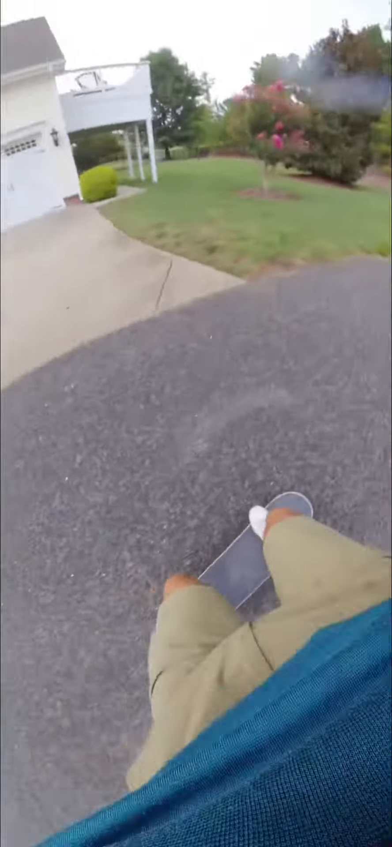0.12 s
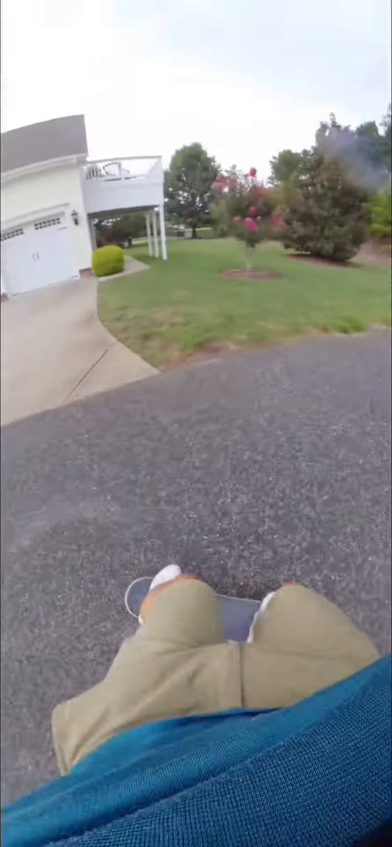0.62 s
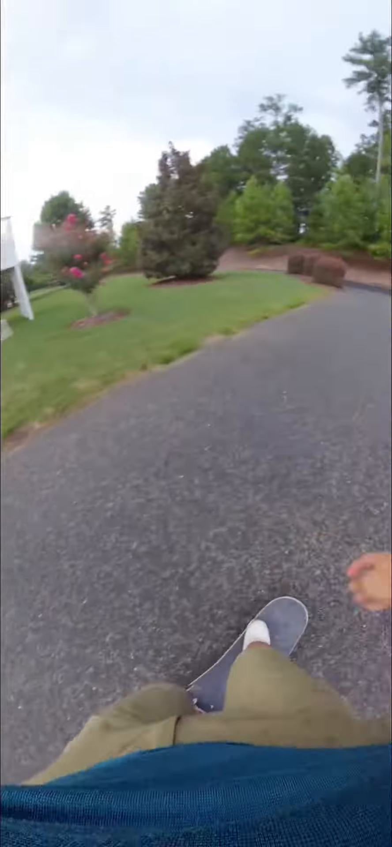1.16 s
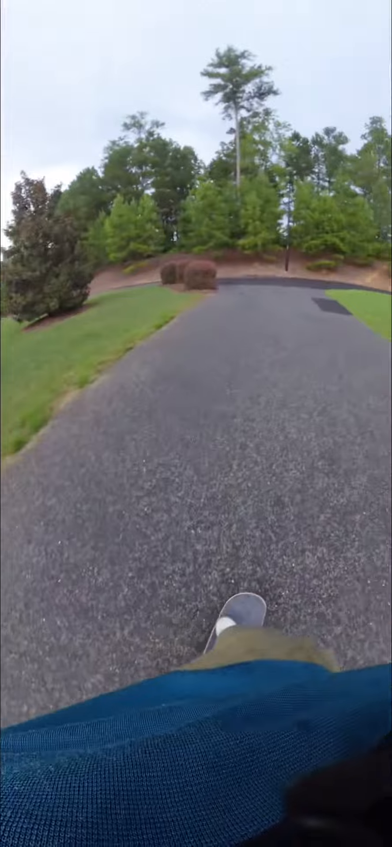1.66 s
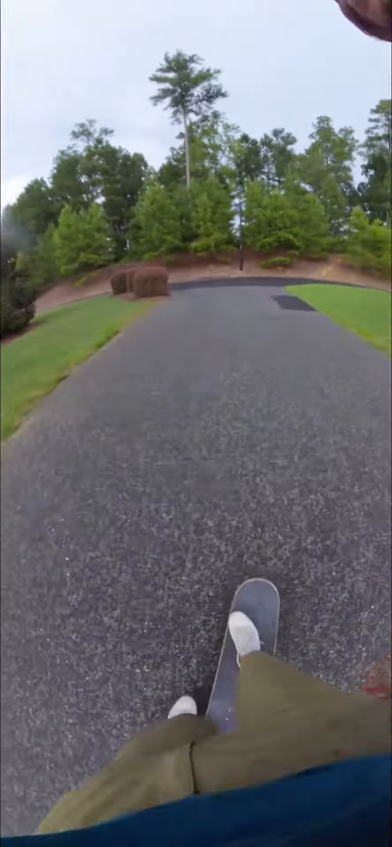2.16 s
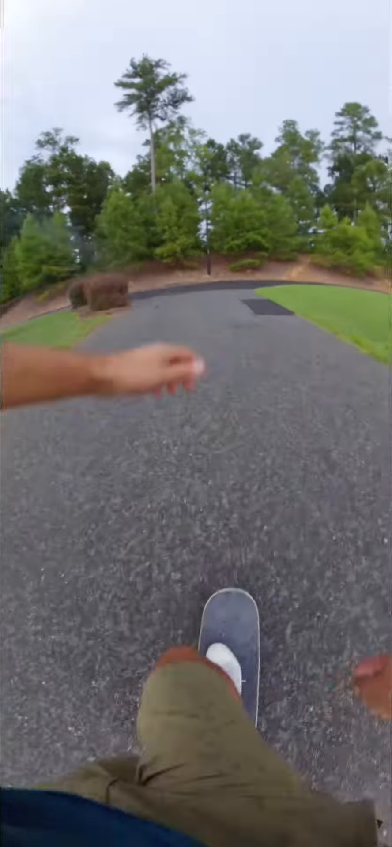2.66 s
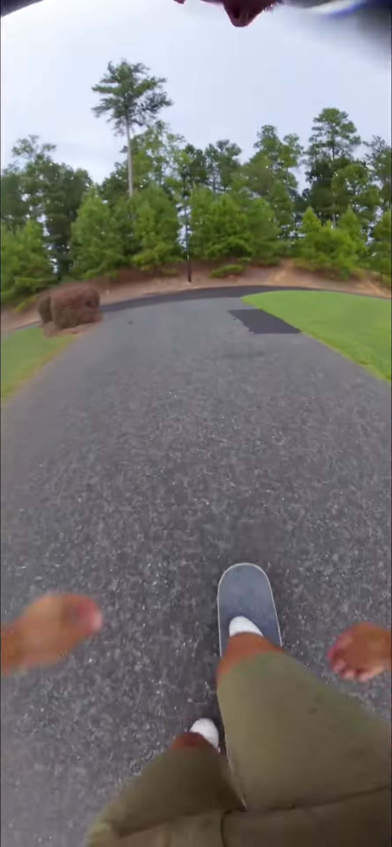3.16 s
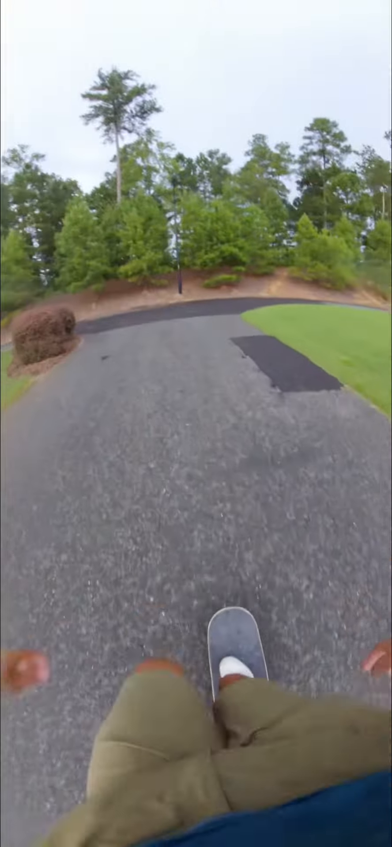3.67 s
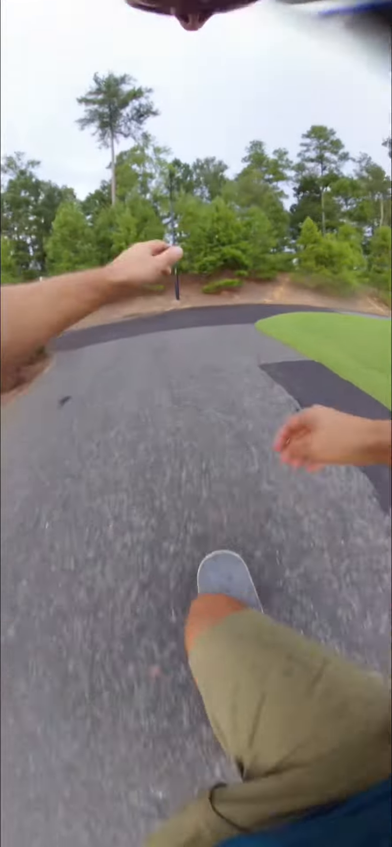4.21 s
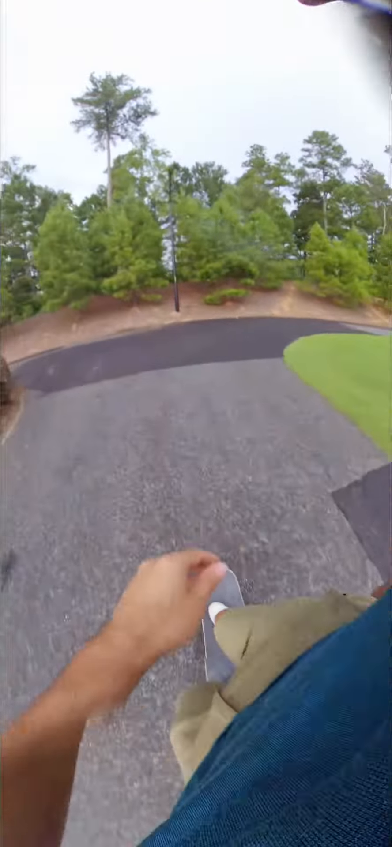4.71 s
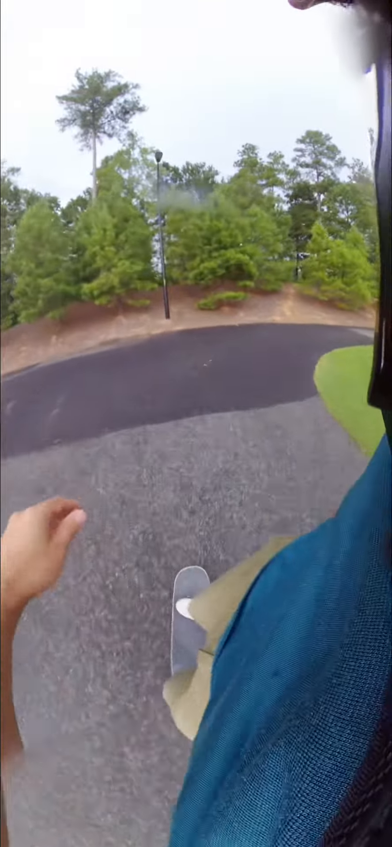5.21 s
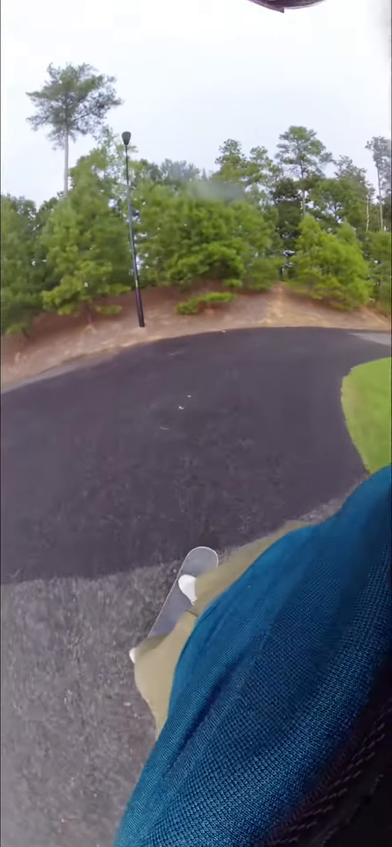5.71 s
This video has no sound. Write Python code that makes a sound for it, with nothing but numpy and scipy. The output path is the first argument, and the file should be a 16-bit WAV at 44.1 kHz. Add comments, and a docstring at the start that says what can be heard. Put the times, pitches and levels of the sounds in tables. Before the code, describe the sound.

Close, body-worn perspective of a skateboard growling along rough pavement, swelling with three pushes and punctuated by wooden knocks and tiny pebble ticks.

```python
"""Skateboard on coarse asphalt

A skateboard rolls down a quiet street, heard by a small camera worn on the chest.
Random road bumps and timed knocks ring the modes of flex, deck, wheels and trucks; filtered grains growl and scrape.
Grit and cloth hiss through the camera's port resonance, while short decaying tones make the ticks and pebbles.
Low filtered bumps are the dull rumble of the loaded board; narrow noise passes by and high harmonics buzz thinly."""
import sys
import numpy as np
from scipy import signal
from scipy.io import wavfile
from scipy.ndimage import uniform_filter1d

SR = 44100
rng = np.random.default_rng(int(sys.argv[2]) if len(sys.argv) > 2 else 0)


def inscribe(sig):
    """Save sig as 16-bit PCM at rate SR to the path in sys.argv[1].

    A 1-D sig is mono; a 2-D sig holds one channel per row.
    Samples are clipped to [-1, 1] before scaling.
    """
    pcm = np.round(np.clip(np.atleast_2d(sig).T, -1, 1) * 32767)
    wavfile.write(sys.argv[1], SR, pcm.astype(np.int16))


def ratio_of_db(decibels):
    """Turn decibels (scalar or array-like) into linear amplitude factors; 0 dB maps to 1."""
    return 10 ** (np.asarray(decibels, float) / 20)


N = 257544

# rolling on the road: t/s, deck drone level/dB, deck flex level/dB
ROLLING = [(0.0, -38.5, -43), (0.49, -29.5, -27.5), (0.65, -31, -29.5), (0.94, -25, -32.5),
           (1.09, -61, -66), (1.25, -29.5, -35.5), (1.64, -33.5, -33.5), (1.82, -39.5, -69),
           (2.08, -30.5, -30), (2.37, -24.5, -22.5), (2.89, -31, -28.5), (3.15, -18, -24.5),
           (3.66, -30, -35), (4.02, -18, -22), (4.39, -25, -39.5), (4.65, -23, -31), (5.19, -24.5, -29),
           (5.84, -30, -35)]
# cracks and pebbles knocking the board: t/s, deck level/dB, flex level re deck/dB, wheel level re deck/dB
BOARD_KNOCKS = [(0.363, -12.5, -25, -33), (0.559, 3, -39, -18), (0.568, -22.5, 13.5, 5),
                (0.577, -33, 14, -5), (0.663, -36.5, -12, 17.5), (0.955, -25, 4, 1.5), (1.085, -18.5, 1, 0),
                (1.091, -8, -8, 2), (1.103, -10, -30, -15), (1.108, -12.5, -27, -20),
                (1.498, -21, -17, -17), (1.521, -27, 4, 6), (1.535, -17, -4, -10), (1.549, -24, -19, 2.5),
                (1.774, -17, -9, -7), (1.819, -27, 5.5, 8.5), (2.488, -16, -1, -15),
                (3.113, -17.5, 2.5, -16), (3.2895, -11, -24, -14), (3.302, -10.5, -27, -33),
                (4.174, -10.5, -2.5, -10.5), (4.182, -2.5, -42, -37), (4.199, -15, -12, -21),
                (4.385, -12.5, -30, -39), (4.996, -25.5, 10.5, -22), (5.141, -13, -30, -10),
                (5.315, -12, -22, -17), (5.529, -21, -25, 2), (5.537, -18, -10, -8), (5.547, -11, -19, -21),
                (5.648, -5, -12.5, -6.5), (5.678, -23, -1, -12), (5.779, -14, -4, -4)]
# grit ticks, pitched at the port resonance: t/s, level/dB
GRIT_TICKS = [(1.008, -42), (1.087, -33), (1.093, -25.5), (1.1042, -26), (1.5207, -27), (1.523, -34),
              (1.535, -20.5), (1.5497, -19), (1.5614, -26), (1.775, -32), (2.329, -31.5), (2.479, -31.5),
              (2.896, -33), (3.097, -34), (3.3, -31.5), (4.112, -33), (4.1842, -31.5), (5.1704, -37),
              (5.496, -38)]
# pebbles on the trucks: t/s, level/dB, f/Hz
PEBBLE_PINGS = [(0.561, -25.5, 1970), (0.569, -38, 3800), (0.614, -38.5, 2020), (0.717, -39, 1940),
                (0.79, -41, 2700), (0.822, -51, 2580), (0.858, -43, 2600), (0.929, -47, 3800),
                (0.957, -37, 1900), (0.964, -40, 2060), (1.086, -30, 5870), (1.089, -30.5, 4400),
                (1.096, -29, 2400), (1.101, -33, 2310), (1.105, -29, 3240), (1.161, -34, 1690),
                (1.161, -36, 3300), (1.522, -31.5, 4000), (1.775, -31.5, 4430), (1.776, -35, 2400),
                (1.8838, -28.5, 1490), (2.357, -32, 2050), (2.375, -34, 2230), (2.482, -32.5, 2870),
                (2.585, -36.5, 2400), (2.629, -32, 1920), (2.86, -40, 2620), (2.8953, -31, 2270),
                (2.925, -41, 2630), (2.955, -41, 1850), (3.015, -33, 2640), (3.115, -38, 2820),
                (3.295, -32, 2380), (3.7768, -38.5, 2220), (3.8355, -35, 2630), (4.187, -37, 2690),
                (4.457, -43, 2500), (4.8005, -51, 2260), (5.171, -44, 4550), (5.172, -37.5, 3000),
                (5.529, -34, 4270), (5.679, -27.5, 1980)]
# grit and cloth hiss: t/s, port peak level/dB, port centre f/Hz, level of the bed below it/dB
HISS_COURSE = [(0, -64, 9200, -52), (.13, -57, 8540, -84), (.34, -58.5, 9570, -56.5),
               (.45, -46, 9400, -45.5), (.62, -59, 9000, -63), (.8, -54, 8740, -60),
               (1.0, -59, 9200, -55.5), (1.27, -60.5, 9440, -47.5), (1.38, -41.5, 8660, -57),
               (1.52, -41, 8500, -71), (1.68, -50, 8930, -51), (2.11, -50.5, 8810, -54),
               (2.34, -44.5, 8670, -48.5), (2.56, -50, 8780, -52), (3.08, -48.5, 8620, -53),
               (3.58, -52.5, 8800, -56.5), (4.08, -49.5, 8770, -49.5), (4.19, -46.5, 8700, -46),
               (4.33, -51.5, 8440, -77), (4.6, -61.5, 8760, -54.5), (4.85, -53, 8680, -94),
               (5.05, -51.5, 8500, -55), (5.23, -59.5, 9750, -54.5), (5.55, -61.5, 9700, -55),
               (5.84, -52, 9250, -44.5)]
# passing patches of narrow hiss: start t/s, end t/s, centre f/Hz, width f/Hz, level/dB
HISS_PATCHES = [(0.8, 0.95, 6940, 330, -67), (1.67, 1.96, 4200, 420, -56), (5.02, 5.165, 4060, 380, -59.5),
                (5.6, 6.0, 6600, 1500, -52.5), (5.79, 6.0, 6800, 1300, -50)]
# modes of the four board parts, each: f/Hz, relative level/dB, t60/s
FLEX_MODES = [(222.4, -1.5, 0.034), (286.3, -0.5, 0.12), (311.8, -2, 0.11)]
DECK_MODES = [(451, -3.5, 0.045), (534.4, -5, 0.077), (598, 2.5, 0.033), (673.7, 5, 0.039),
              (821, -18, 0.098)]
WHEEL_MODES = [(889, 0.56, 0.018), (1080, 13.6, 0.0046), (1265, 2.5, 0.022)]
TRUCK_MODES = [(1340, 14.5, 0.0082), (1600, 14, 0.011), (2180, 0.5, 0.029), (2700, -8.5, 0.069),
               (3000, 5, 0.0092)]
# harmonics of the electric buzz: harmonic number, level/dB
BUZZ_HARMONICS = [(111, -70), (112, -63), (113, -64), (114, -69), (116, -71), (117, -71)]
# when the buzz is heard: start t/s, end t/s
BUZZ_TIMES = [(1.3, 3.35), (4.75, 5.05)]
# foot pushes: weight leaves the board t/s, returns t/s, strength 0-1
FOOT_PUSHES = [(2.192, 2.376, 1), (3.109, 3.298, 0.97), (3.996, 4.186, 0.5)]
# rasp of the trucks in turns and pushes: start t/s, loudest t/s, end t/s, level/dB
# (where the end precedes the loudest time, the rise is cut off at the end)
TRUCK_RASPS = [(0.265, 0.456, 0.59, -36), (2.102, 2.3, 2.26, -40), (2.86, 3.221, 3.15, -42.5),
               (3.74, 4.104, 4.13, -40), (4.72, 4.817, 5.39, -57.5), (5.002, 5.342, 6, -46),
               (5.546, 5.84, 6.03, -54)]
# rumble of the loaded board: t/s, rumble level/dB, deep rumble level/dB
LOAD_RUMBLE = [(0, -34.5, -37), (.35, -34, -22), (.63, -35.5, -31.5), (1.0, -28.5, -26), (1.3, -34.5, -35),
               (1.7, -31, -31), (2.0, -35.5, -40), (2.5, -30, -27.5), (2.7, -29.5, -35), (2.9, -27.5, -45),
               (3.3, -22, -36), (3.6, -31, -35), (3.85, -28, -37), (4.2, -27, -31), (4.6, -32, -47),
               (5.1, -33, -21.5), (5.4, -27.5, -34), (5.84, -29, -29.5)]
# wheels scraping in turns and pushes, in ridges that slide as the rider bends:
# start t/s, loudest t/s, end t/s, ridge spacing at start f/Hz, at end f/Hz, grain level/dB
WHEEL_SCRAPES = [(0.32, 0.42, 0.555, 780, 740, -43), (2.1, 2.3, 2.42, 430, 480, -49),
                 (2.86, 3.18, 3.33, 340, 500, -46), (3.75, 4.06, 4.2, 360, 500, -46),
                 (4.69, 4.82, 4.92, 560, 480, -45.5)]
# growl of the upper deck range under load: start t/s, loudest t/s, end t/s, level/dB
DECK_GROWLS = [(0.62, 0.82, 1.06, -37), (2.08, 2.17, 2.22, -38), (2.83, 3.0, 3.14, -30.5),
               (3.66, 3.9, 4.05, -31)]


def unit(x):
    """Scale to rms 1."""
    return x / np.sqrt(np.mean(x ** 2))


def curves(table):
    """Draw a table's columns as straight-line curves over its times."""
    s, *columns = np.transpose(table)
    return [np.interp(np.arange(N) / SR, s, c) for c in columns]


def band(x, hz, width):
    """Two-pole resonance."""
    return signal.lfilter(*signal.iirpeak(min(hz, .45 * SR), hz / width, fs=SR), x)


def walk(rate):
    """Random levels held 1 / rate s and smoothed twice; spread near 1."""
    hold = int(SR / rate)
    steps = np.repeat(rng.standard_normal(N // hold + 1), hold)
    return unit(uniform_filter1d(uniform_filter1d(steps, hold), hold)[:N])


def gate(start, end, fade):
    """Window between two times with straight fades in and out."""
    t = np.arange(N) / SR
    return np.clip(np.minimum(t - start, end - t) / fade, 0, 1)


def ramp(start, top, end):
    """Straight rise to 1 and straight fall."""
    return np.interp(np.arange(N) / SR, [start, top, end], [0, 1, 0])


def scatter(count):
    """Random times over the whole ride, each with two normal draws."""
    return zip(rng.random(count) * (N - 1) / SR, *rng.standard_normal((count, 2)).T)


def weight_off():
    """How far the rider's weight is on the pushing foot, 0-1."""
    return np.minimum(sum(k * gate(a, b, fade=0.04) for a, b, k in FOOT_PUSHES), 1)


def stones(rate, spread_db):
    """Random bumps, rate per second, a few much larger than the rest; their random sizes are capped at 3."""
    size = np.minimum(rng.exponential(size=N), 3)
    return (rng.random(N) < rate / SR) * rng.standard_normal(N) * ratio_of_db(spread_db * size)


def board():
    """Flex, deck, wheels and trucks ring under the ride; the wood hollows out as the weight lifts."""
    deck_db, flex_db = curves(ROLLING)
    trucks_rest_db = -67.5  # between rasps
    rasp_db = sum((db - trucks_rest_db) * np.sqrt(ramp(a, b, c)) for a, b, c, db in TRUCK_RASPS)
    truck_db = trucks_rest_db + rasp_db
    # the wheels take a small share of the deck's changes and some of each rasp's rise
    wheel_db = -44 + 0.033 * (deck_db - np.mean(deck_db)) + 0.31 * rasp_db
    _, blow_db, low_db, mid_db = np.transpose(BOARD_KNOCKS)
    trucks_under_wheels_db = -23  # in a knock
    flex = board_part(FLEX_MODES, flex_db, blow_db + low_db, push_ms=0.45, rate=1500,
                      spread_db=1.0, patchy_db=1.5, rattle=0.0067)
    deck = board_part(DECK_MODES, deck_db, blow_db, push_ms=0.34, rate=1300,
                      spread_db=2.5, patchy_db=1.0, rattle=0.026)
    wheels = board_part(WHEEL_MODES, wheel_db, blow_db + mid_db, push_ms=0.35, rate=2500,
                        spread_db=2.5, patchy_db=0.6, rattle=0.049)
    trucks = board_part(TRUCK_MODES, truck_db, blow_db + mid_db + trucks_under_wheels_db, push_ms=0.19,
                        rate=2500, spread_db=2.0, patchy_db=3.0, rattle=0.35)
    wood = flex + deck
    # with the weight off, this range of the wood and its octave fall quiet
    hollow_hz, hollow_width_hz = 410, 260
    lift = np.sqrt(weight_off())
    wood = wood - 0.9 * lift * band(wood, hollow_hz, hollow_width_hz)
    wood = wood - lift * band(wood, 2 * hollow_hz, hollow_width_hz) / 2
    return wood + growls() + wheels + trucks


def board_part(modes, roll_db, knock_db, push_ms, rate, spread_db, patchy_db, rattle):
    """One family of modes, shaken by the road and struck by the knocks; the soft wheel smooths each push."""
    push = np.hanning(int(push_ms * SR / 1000) + 3)
    road = np.convolve(stones(rate, spread_db), push)[:N] * ratio_of_db(patchy_db * walk(30))
    rolling = ring(road * ratio_of_db(roll_db), modes, -0.87) / np.std(ring(road, modes, -0.96))
    blows = np.zeros(N)
    blows[(np.array(BOARD_KNOCKS)[:, 0] * SR).astype(int)] = ratio_of_db(knock_db)
    # loose parts chatter for a few ms after each blow
    chatter = np.convolve(blows, np.exp(-np.arange(900) / SR / 0.011))[:N]
    blows = blows + rattle * stones(1500, 8.4) * chatter
    # a blow starts all modes in step, so it peaks early
    single = ring(np.pad(push, (0, 4000)), modes, 0.99)
    # the part radiates poorly outside the range of its modes, so the ring builds over a cycle or two
    low_hz, high_hz = modes[0][0], modes[-1][0]
    hz, width = np.sqrt(low_hz * high_hz), high_hz - low_hz
    single = band(band(single, hz, width), hz, width)
    knocking = signal.fftconvolve(blows, single / np.abs(single).max())[:N]
    return band(rolling, hz, 2 * width) + knocking


def ring(force, modes, flip):
    """Decaying sines driven by a force; neighbours move together (flip near 1) or opposed (near -1)."""
    out = 0
    for k, (hz, db, t60) in enumerate(modes):
        pole = np.exp((2j * np.pi * hz - np.log(1000) / t60) / SR)
        out = out + flip ** k * ratio_of_db(db) * signal.lfilter([1], [1, -pole], force).imag
    return out


def growls():
    """Random bumps through a doubled resonance: the upper deck range growling under load."""
    hz, width_hz = 830, 360
    out = 0
    for start, top, end, db in DECK_GROWLS:
        growl = unit(band(band(stones(1500, 2.9), hz, width_hz), hz, width_hz))
        out = out + ratio_of_db(db) * np.sqrt(ramp(start, top, end)) * growl
    return out


def scrapes():
    """Grainy wheel scraping plus its inverted echo off the ground; as the path shortens, the ridges spread upward."""
    scrape_band = signal.butter(4, [950, 2220], "band", fs=SR, output="sos")
    grain = signal.sosfilt(scrape_band, stones(2000, 2.5))
    grain = unit(grain * ratio_of_db(2.0 * walk(40)))
    i, out = np.arange(N), 0
    for start, top, end, from_hz, to_hz, db in WHEEL_SCRAPES:
        # the echo path changes as the rider bends
        spacing_hz = np.interp(i / SR, [start, end], [from_hz, to_hz])
        echo = np.interp(i - SR / spacing_hz, i, grain)  # delayed by 1 / spacing
        out = out + ratio_of_db(db) * np.cbrt(ramp(start, top, end)) * (grain - 0.85 * echo)
    return out


def ticks():
    """Grit snapping off the wheels and pebbles pinging on the trucks, with many fainter ones at random."""
    peak_db, port_hz, _ = curves(HISS_COURSE)
    # faint grit sits around 9 dB over the hiss peak
    small = [(s, peak_db[int(s * SR)] + 9 + 2 * a) for s, a, _ in scatter(count=30)]
    grit = [(s, db, port_hz[int(s * SR)]) for s, db in GRIT_TICKS + small]
    # faint pebbles sit around -48 dB and 2300 Hz
    chips = [(s, -48 + 3.5 * a, 2300 * 1.2 ** b) for s, a, b in scatter(count=60)]
    return snaps(grit, cycles=25.0, rough=0.65) + snaps(PEBBLE_PINGS + chips, cycles=9.9, rough=0.73)


def snaps(table, cycles, rough):
    """Short pings whose decay lasts a set number of cycles, with some crackle around their pitch."""
    out = np.zeros(N + 600)
    t = np.arange(600) / SR
    for (s, db, hz), noise in zip(table, rng.standard_normal((len(table), 600))):
        fade = np.exp(-t * hz / cycles) * (1 - np.exp(-t * hz / 0.72))
        tone = np.sin(2 * np.pi * hz * t)
        crackle = unit(band(band(noise, hz, 0.83 * hz), hz, 0.83 * hz))
        out[int(s * SR):][:600] += ratio_of_db(db) * (tone + rough * crackle) * fade
    return out[:N]


def load_rumble():
    """Dull, uneven low rumble of the loaded board, falling away while the rider leans into a push."""
    uneven = ratio_of_db(2.0 * walk(15))
    rumble_db, deep_db = curves(LOAD_RUMBLE)
    rumble = signal.lfilter(*signal.butter(2, [170, 560], "band", fs=SR), stones(3000, 0.51))
    deep = signal.lfilter(*signal.butter(2, 210, fs=SR), stones(1200, 0.82)) * ratio_of_db(2.4 * walk(12))
    lull = ratio_of_db(-16 * weight_off())
    return lull * (ratio_of_db(rumble_db) * uneven * unit(rumble) + ratio_of_db(deep_db) * unit(deep))


def hiss():
    """Fine grit and cloth noise: a broad bed and a peak at the port, which shifts as the body shades it."""
    peak_db, hz, bed_db = curves(HISS_COURSE)
    flicker = ratio_of_db(1.5 * walk(30))
    bed = unit(band(stones(15000, 0.74), 1360, 3200)) * ratio_of_db(bed_db) * flicker
    # noise around zero, shifted up to the moving centre
    grains = stones(15000, 4.6) + 1j * stones(17000, 0.89)
    base = signal.lfilter(*signal.butter(1, 900, fs=SR), grains)
    carrier = np.exp(2j * np.pi * np.cumsum(hz) / SR)
    port = unit((base * carrier).real) * ratio_of_db(peak_db) * flicker
    return bed + port


def patches():
    """Narrow hisses that come and go: noise through a doubled resonance, fluttering in level."""
    out = 0
    for start, end, hz, width, db in HISS_PATCHES:
        flutter = ratio_of_db(1.8 * walk(60))
        noise = unit(band(band(rng.standard_normal(N), hz, width), hz, width))
        out = out + ratio_of_db(db) * flutter * gate(start, end, 0.022) * noise
    return out


def buzz():
    """Thin electric buzz: a few high harmonics of a steady pulse train, faint and wavering."""
    t = np.arange(N) / SR
    pulse_hz = 131.315
    lines = sum(ratio_of_db(db) * np.sin(2 * np.pi * order * pulse_hz * t) for order, db in BUZZ_HARMONICS)
    waver = ratio_of_db(2.5 * walk(25))
    return waver * sum(gate(start, end, 0.053) for start, end in BUZZ_TIMES) * lines


def scene():
    """All sources at the microphone."""
    return (board() + scrapes() + ticks() + load_rumble() + hiss() + patches() + buzz())[None]


def duck(x):
    """Gain control: peaks above a threshold turn the level down a moment later, and it recovers."""
    threshold, depth = 0.21, 16.4
    over = np.maximum(np.abs(x) - threshold, 0)
    for smooth_s in (0.051, 0.033):  # two smoothers in series
        keep = np.exp(-1 / (smooth_s * SR))
        over = signal.lfilter([1 - keep], [1, -keep], over)
    return x / (1 + depth * over)


def band_limit(x):
    """A steep low-pass at the top of the band."""
    return signal.sosfilt(signal.butter(12, 15750, fs=SR, output="sos"), x)


def record(dry):
    """The camera cuts the bass (a little leaks past), dulls the top, ducks after loud peaks and rounds them."""
    low_cut = signal.butter(7, 138, "high", fs=SR, output="sos")
    thin = signal.sosfilt(low_cut, dry) + ratio_of_db(-30.0) * dry
    dull = signal.sosfilt(signal.butter(3, 11560, fs=SR, output="sos"), thin)
    mix = 1.103 * np.tanh(duck(dull) / 1.334)
    return band_limit(mix)


dry = scene()
out = record(dry)
inscribe(out)
```